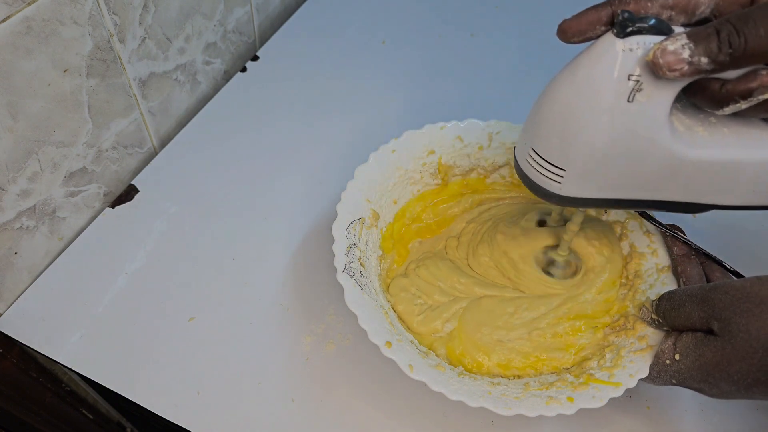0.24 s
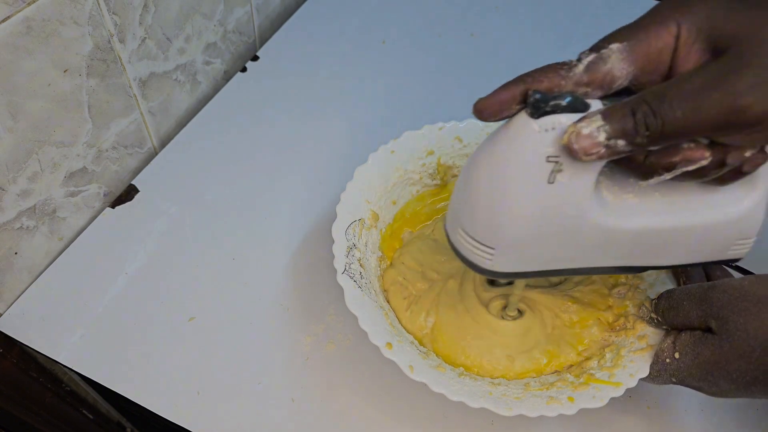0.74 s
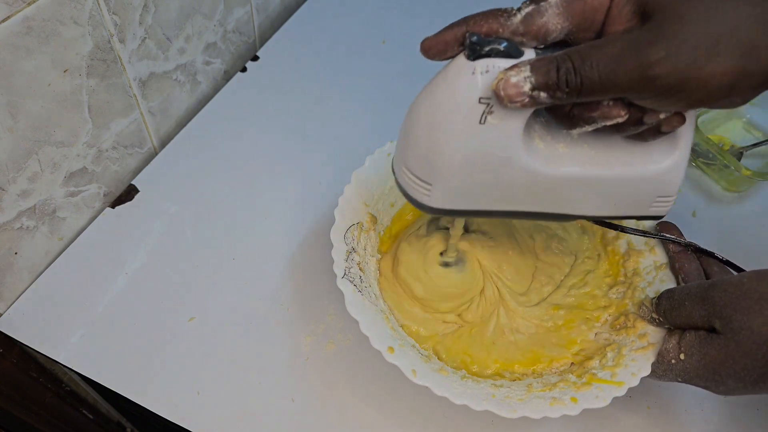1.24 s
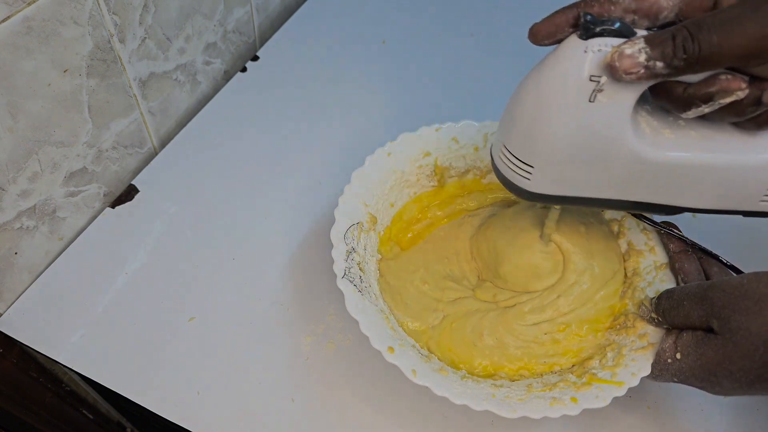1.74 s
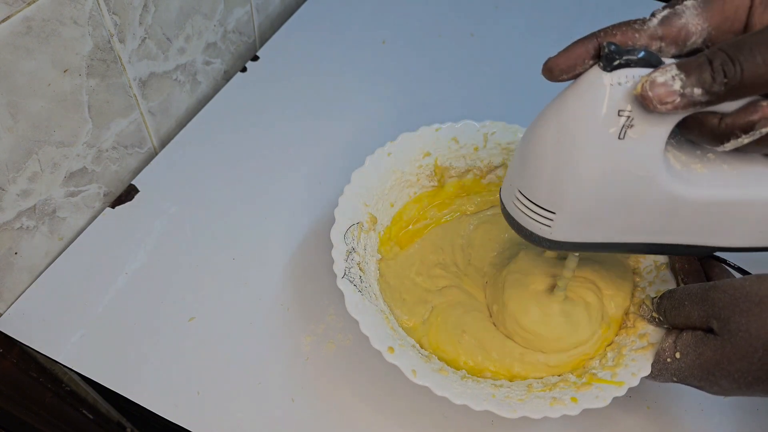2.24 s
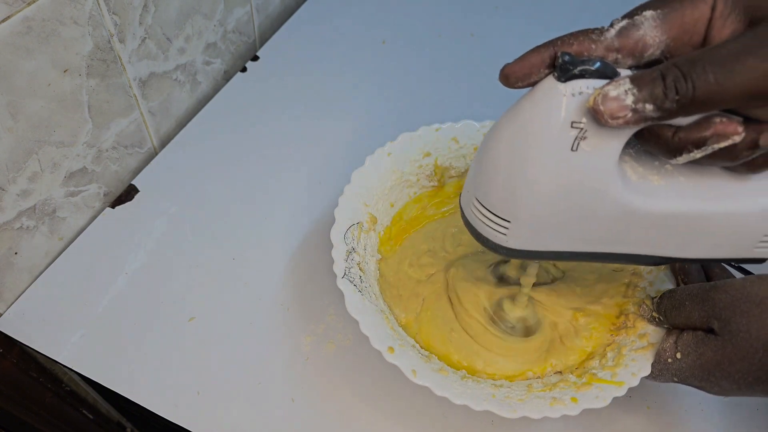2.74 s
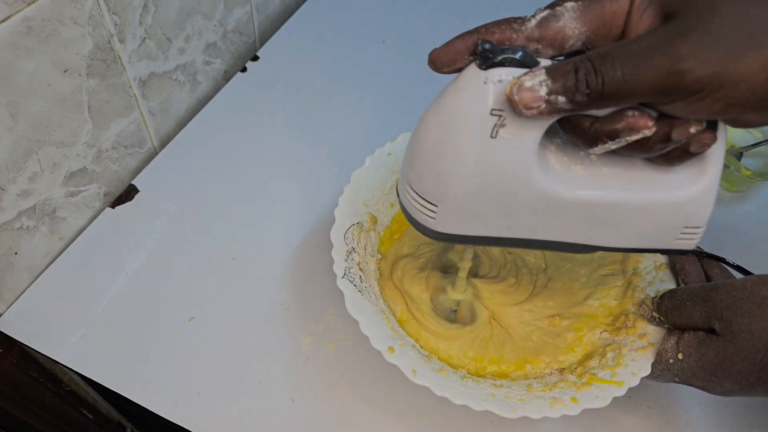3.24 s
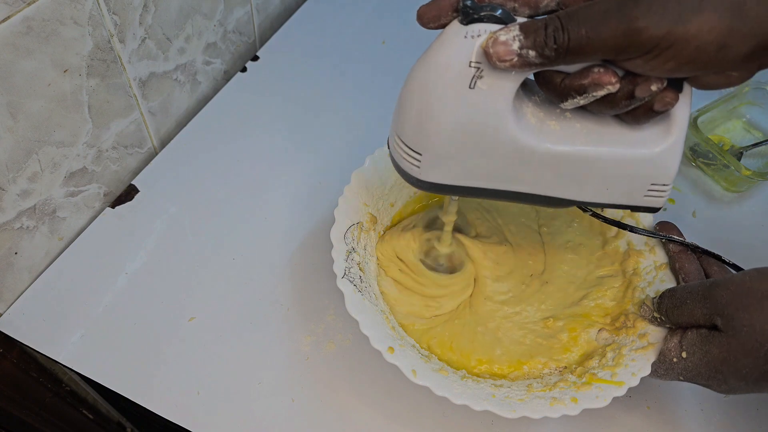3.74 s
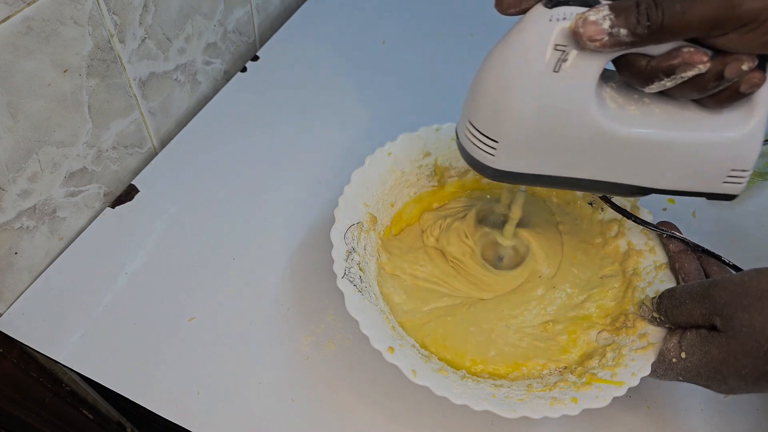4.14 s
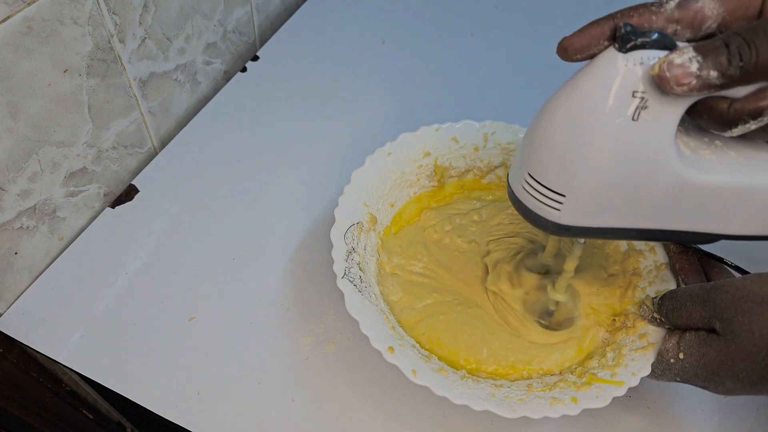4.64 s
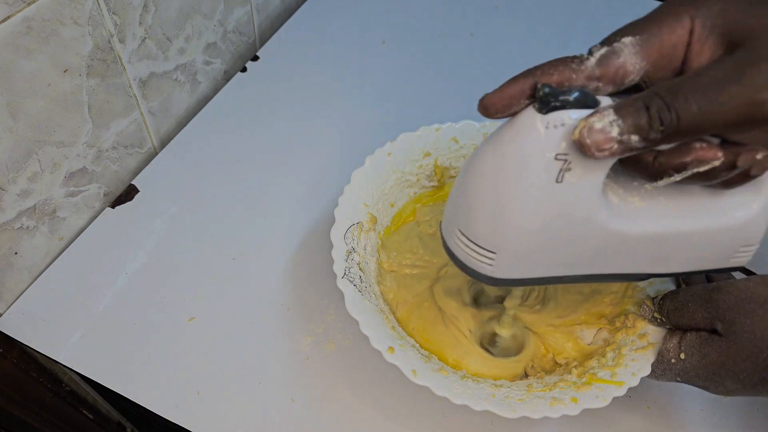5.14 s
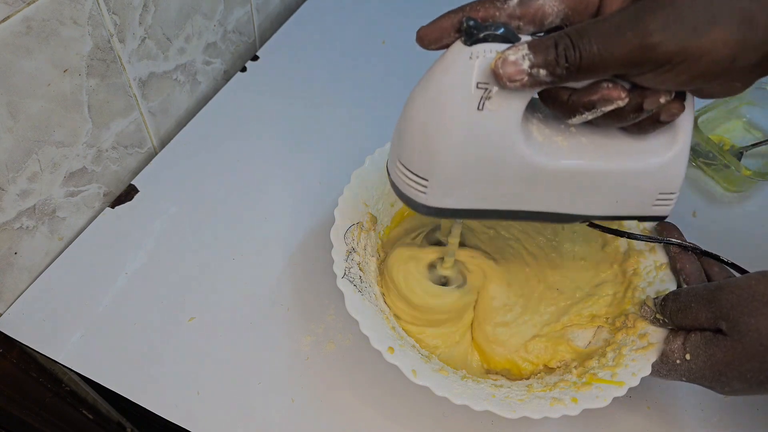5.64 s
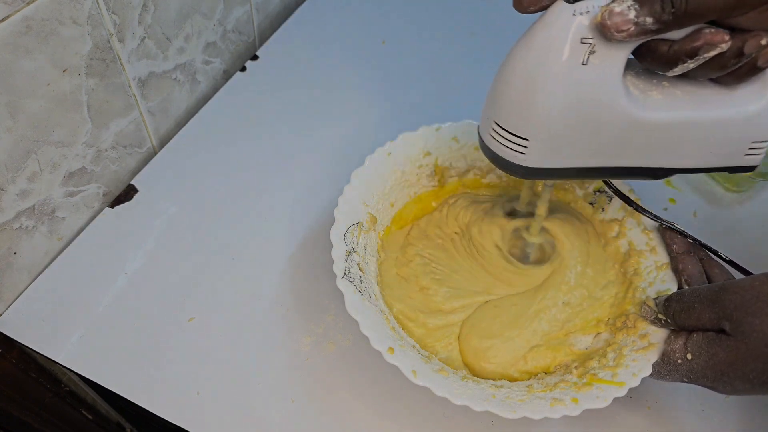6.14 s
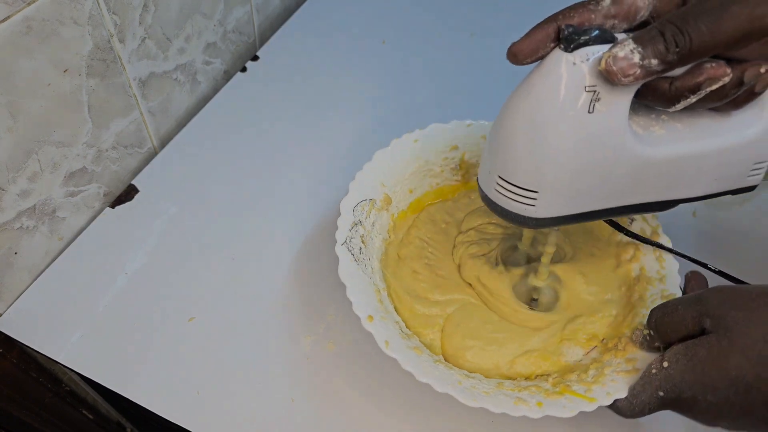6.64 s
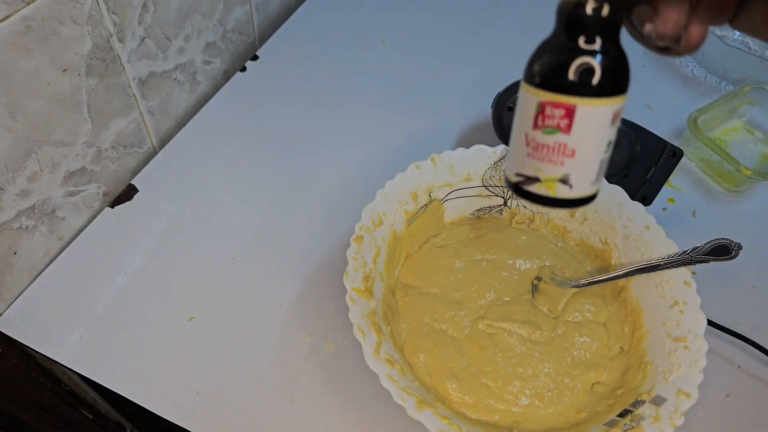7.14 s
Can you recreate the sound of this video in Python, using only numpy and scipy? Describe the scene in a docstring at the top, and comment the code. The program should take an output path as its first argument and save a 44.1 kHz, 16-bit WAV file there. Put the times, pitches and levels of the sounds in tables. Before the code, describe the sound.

Close buzzing whirr of a hand mixer, its pitch dipping and climbing under load, with brief bowl knocks and an abrupt stop.

```python
"""Hand mixer in thick batter

An electric hand mixer circles through a bowl of batter, close below a stereo microphone. Its motor sags under
load and sings sines on the shaft orders, which the casing modes lift. Shaped noise gives gear rattle, casing
boom, fan hiss and bowl drone; the beaters thud on the bowl and shake the counter beneath. Near 6.9 s all the
mixer's sound drops away within a millisecond, leaving the low rumble and faint tone of the quiet kitchen."""
import sys
import numpy as np
from scipy import signal
from scipy.fft import rfft, irfft
from scipy.io import wavfile
from scipy.ndimage import uniform_filter1d

SR = 44100
rng = np.random.default_rng(int(sys.argv[2]) if len(sys.argv) > 2 else 0)


def waveform_to_disk(signal):
    """Save audio, clipped to [-1, 1], as 16-bit WAV at the path in sys.argv[1]."""
    frames = np.transpose(np.atleast_2d(signal))
    scaled = np.clip(frames, -1, 1) * 32767
    samples = np.round(scaled).astype(np.int16)
    wavfile.write(sys.argv[1], SR, samples)


N = 326207  # samples

# Beaters rubbing the bowl. Each row: start in seconds, length in seconds, thud level in dB,
# bowl drone in dB, casing boom in dB, snag from 0 to 1.
SCRAPES = [(0.623, .14, -41, -53.5, -34, 0), (0.794, .15, -31, -45.5, -32, 0.43),
           (.97, 0.19, -50, -43.5, -33.5, 0.08), (2.953, .7, -60.5, -47, -36.5, .3),
           (4.947, .12, -49.5, -45.5, -41, 0.07), (5.102, 0.427, -53, -44, -37, 0.99)]
THUD_COLUMN, DRONE_COLUMN, BOOM_COLUMN = 2, 3, 4
GEAR, WIRES = 19.7, 4  # shaft turns for each beater turn; wires on a beater


def mixer():
    """Order synchronism: motor, gears, fan and beaters all take their pace from one shaft."""
    # The shaft under the changing load. Each row: time in seconds, speed in turns per second
    # before the rotor's inertia smooths it.
    speed = [(0.0, 274), (0.29, 273.0), (0.46, 277.2), (0.59, 282.3), (1.02, 287.3), (1.17, 283.6),
             (1.3, 277.6), (1.49, 255.1), (1.65, 243), (1.74, 239.5), (1.8, 241), (2.03, 262.6),
             (2.99, 320.6), (3.16, 325.6), (3.31, 328.5), (4.02, 311.1), (4.37, 314.9), (5.06, 315.6),
             (5.5, 302.6), (5.69, 301.1), (6.02, 305.3), (6.3, 301.9), (6.69, 311.5), (6.88, 308.9)]
    # The motor's state. Each row: time in seconds, level of the first order in dB (its swing about
    # the mean moves all the orders), left over right of the middle orders in dB, gear rattle in dB.
    motor = [(0, -54.5, 22, -32), (.14, -44, 7, -34), (.4, -41.5, 0.5, -35), (.73, -38.5, 2.5, -31),
             (1.09, -38.5, -6, -36), (1.24, -43.5, 5, -34), (1.62, -47, -7, -33), (1.76, -40.5, 1, -36.5),
             (1.92, -48.5, -6, -33.5), (2.05, -46, 2.5, -37), (2.57, -37, 3, -31), (2.78, -45, 0, -29.5),
             (2.97, -38.5, -2, -28.5), (3.2, -39, 8, -31), (3.7, -38, 1, -34), (4.1, -45.5, -0.5, -33.5),
             (4.5, -39, 4, -32), (5, -41.5, -4, -29.5), (5.5, -40, 4, -35), (5.8, -41, -2, -32.5),
             (6.25, -40, -3, -31), (6.6, -42.5, 0, -32), (6.88, -45, -1, -29.5)]
    inertia_s = 0.1  # the rotor rounds off speed changes
    shaft_hz = uniform_filter1d(columns(speed)[0], size=round(inertia_s * SR), mode="nearest")
    first_db, side_db, rattle_db = columns(motor)

    turns = np.cumsum(shaft_hz) / SR
    passes = WIRES * turns / GEAR  # beater wires passing one spot
    once_a_turn = np.cos(2 * np.pi * turns)
    each_pass = np.cos(2 * np.pi * passes)

    machine = whine(turns, shaft_hz, first_db, side_db) + casing_boom(each_pass)
    machine = machine + gear_rattle(rattle_db, once_a_turn) + fan_hiss(shaft_hz, once_a_turn)
    return machine + thuds(passes) + bowl_drone(each_pass) + counter_shake(passes, each_pass)


def whine(turns, shaft_hz, first_db, side_db):
    """Harmonic orders of rotation, lifted by resonances they pass and out of step at the two ports."""
    # The strong orders. Each row: order, level in dB before swings and resonances, share of the first
    # order's swings, out-of-step share, left over right in dB, share that rocks with the beaters
    # in a snag, level change in a full snag in dB.
    loud = [(1, -42, 1, .45, -2.5, 0.62, 4), (2, -63.5, .2, 0.12, 1.5, 0.066, 2.5),
            (3, -47, .6, .52, 2, .3, -1.5), (4, -53, .6, 0.66, -4, .3, -1),
            (5, -46.5, .6, 0.92, -.3, .3, -15), (7, -48, .3, .9, 0.5, .3, 4),
            (9, -44.5, .3, 0.63, 4.5, .1, 1), (12, -52.5, .2, 0.67, 0.5, .1, -2),
            (24, -57.5, .2, 1, 2, .1, 4.5), (36, -61.5, .2, .9, -17.5, .1, -1.5),
            (47, -68.5, .2, .9, -3.2, .1, -1)]
    # The fainter orders; fan blades and commutator bars lift those near multiples of twelve.
    # Each row: order, level in dB before swings and resonances.
    faint = [(6, -51), (8, -52.5), (10, -71), (11, -66), (13, -56.5), (14, -62.5), (16, -58), (18, -62.5),
             (20, -70.5), (21, -67), (22, -63.5), (23, -64), (25, -67), (26, -64), (27, -70.5), (28, -74.5),
             (29, -65.5), (30, -66), (31, -69.5), (32, -71), (33, -70), (34, -69.5), (35, -66.5),
             (37, -58.5), (38, -72), (46, -67), (48, -68)]
    # Casing modes that lift an order passing through. Each row: centre in Hz, width in Hz, lift in dB.
    shell = [(634, 35.6, 35.5), (752, 60, 3.5), (799, 50, 6.5), (955, 21, -5), (1089, 49, 12.5),
             (1211.5, 48, 11), (1314, 161, 13), (1517, 27, 7.5), (1557, 50, 7.5), (1730, 80, 0.5),
             (1873, 68, 7.5), (2261, 180, -1.5), (2622, 210, 2), (2884, 36, 3), (3660, 230, 6.5)]
    # Air slots that lift the high orders. Each row: centre in Hz, width in Hz, lift in dB.
    vents = [(7216, 250, 12), (7610, 720, 9), (11471, 400, -4.5), (14630, 500, 14.5)]
    # Single orders swell or fade for a moment.
    # Each row: start in seconds, length in seconds, order, level change in dB.
    sings = [(0, 0.74, 3, 2), (.2, 0.14, 5, 3), (0.547, 0.4, 5, -7), (.55, 1.2, 4, -1.5),
             (.55, 0.67, 9, 0.5), (1.22, .3, 3, 6), (1.2, .35, 9, 4), (1.38, .45, 7, 8.5), (1.2, .4, 25, 6),
             (1.62, 0.26, 5, 5.5), (1.62, 0.17, 9, 4), (1.618, 0.19, 12, 6.5), (1.65, .22, 3, 2),
             (1.95, 0.48, 5, 2.5), (2.33, 0.21, 9, 7), (2.55, 1.45, 5, -8), (2.624, .2, 4, 2),
             (2.95, 0.58, 4, 5), (3, .55, 22, 3.5), (3.6, 0.53, 24, 4), (3.95, .2, 12, 7.5),
             (4.15, .55, 36, 7), (4.15, 0.45, 24, -9), (4.242, .45, 9, 5.5), (4.55, 0.43, 3, 5),
             (4.8, 0.23, 12, 4), (4.856, 0.22, 24, 7.5), (5.349, 0.28, 24, 2.5), (5.9, 0.54, 5, -0.5),
             (5.95, 0.24, 2, 4.5), (6.506, .4, 4, -1.5)]

    out = np.zeros((2, N))
    rows = loud + [(order, db, 0.2, 0.9, 0, 0, -3) for order, db in faint]
    swell = wander(rate=4, count=len(rows))
    skew = wander(rate=0.53, count=len(rows))
    flutter = wander(rate=25, count=len(rows))
    slop = 0.0056 * wander(rate=40, count=1)[0]  # the shaft runs a little unevenly (turns)
    wobble = np.cos(2 * np.pi * turns / GEAR)  # the load swings once each beater turn
    snag = sum(row[-1] * held(row) for row in SCRAPES)
    grid = np.arange(0, SR / 2, 2.0)  # Hz
    lift = np.sqrt(1 + modes(shell + vents, grid) ** 2)

    for k, (order, db, follows, share, lean_db, rocks, snag_db) in enumerate(rows):
        order = round(order)
        # the middle orders lean left and right as the mixer moves
        lean_db = lean_db + side_db * (2 < order < 6)

        # level: load swings, snags, chance and brief swells or fades
        db = db + follows * (first_db - first_db.mean()) + snag_db * snag
        db = db + 1.6 * flutter[k] + 1.3 * swell[k] * (order > 2)
        db = db + sum(row[3] * held(row) for row in sings if round(row[2]) == order)
        if k >= len(loud):  # faint orders waver more
            db = db + 2.73 * flutter[k] + 1.3 * swell[k]
        size = np.sqrt(2) * gain_of(db) * np.interp(order * shaft_hz, grid, lift)

        # amplitude modulation by the beater load, deeper in a snag
        rocking = np.clip(rocks * snag, 0, 1)
        size = size * (1 - rocking + (0.11 / order + 0.9 * rocking) * wobble)

        # a quadrature part of opposite sign puts the ports out of step
        angle = 2 * np.pi * (order * (turns + slop) + rng.random())
        across = share * (1 + 0.3 * skew[k]) * np.cos(angle)
        out[0] += size * gain_of(lean_db / 2) * (np.sin(angle) + across)
        out[1] += size / gain_of(lean_db / 2) * (np.sin(angle) - across)
    return out


def gear_rattle(rattle_db, once_a_turn):
    """Resonant filtering: high casing modes colour noise that is amplitude-modulated once a shaft turn."""
    # High casing modes. Each row: centre in Hz, width in Hz, relative level in dB.
    rattle_modes = [(1295, 400, -6), (1841, 24, -4), (1911, 173, 4.5), (2082, 90, 3.5), (2535, 90, 0),
                    (2860, 67, -1.5), (3670, 180, -5.5), (7320, 220, -12.5)]
    rattle = gain_of(rattle_db) * noise(lambda hz: modes(rattle_modes, hz), patchy_db=0.97)
    chatter = gain_of(1.0 * wander(rate=70, count=1))  # loose gears chatter unevenly
    return rattle * (1 + 0.19 * once_a_turn) * chatter


def casing_boom(each_pass):
    """Forced resonance: low casing modes filter noise that swells slightly at each wire pass."""
    # Low casing modes. Each row: centre in Hz, width in Hz, relative level in dB.
    boom_modes = [(660, 150, 7.5), (674, 40, 7), (796, 440, -7)]
    boom = noise(lambda hz: modes(boom_modes, hz), patchy_db=0.72)
    free_db = -40  # beaters turning in batter alone
    return scrapes(free_db, BOOM_COLUMN) * boom * (1 + 0.069 * each_pass)


def fan_hiss(shaft_hz, once_a_turn):
    """Aerodynamic noise: broadband fan hiss whose level rises with shaft speed."""
    # Colour of the hiss. Each row: frequency in Hz, relative spectral level in dB.
    hiss_colour = [(88, -54.5), (150, -17.5), (259, -14.5), (308, -16.5), (482, -19.5), (621, -2),
                   (1050, -13), (1960, -7.5), (3190, -12.5), (3650, -13.5), (15700, -23.5)]
    base_db, db_per_hz, base_hz = -31, 0.0738, 309  # level at the base shaft speed, and its slope
    hiss_db = base_db + db_per_hz * (shaft_hz - base_hz)
    hiss = noise(lambda hz: gain_of(read(hiss_colour, hz)), patchy_db=1.3)
    return gain_of(hiss_db) * hiss * (1 + 0.037 * once_a_turn)


def thuds(passes):
    """Impact excitation: each wire pass gives a dull blow, and the hardest knocks ring bowl modes."""
    # Colour of the bowl on the counter. Each row: frequency in Hz, relative level in dB.
    thud_colour = [(30, -5.5), (55, 1.5), (120, -1.5), (250, 2), (500, -2.5), (800, -10), (1500, -4.5),
                   (4000, -60.5)]
    # The hardest knocks. Each row: time in seconds, level in dB applied to all the rings.
    hard_knocks = [(0.609, -20), (0.654, -19), (0.8, -8.5), (0.811, -14), (0.836, -10.5), (0.849, -14),
                   (0.87, -9), (0.905, -9), (0.924, -15), (1.002, -24), (1.084, -18.5), (1.109, -28),
                   (1.141, -16), (1.154, -32), (4.989, -18), (5.049, -30), (5.099, -19)]
    # Bowl rings. Each row: frequency in Hz, starting level in dB within a knock, 60 dB decay in seconds.
    bowl_rings = [(60, -23, 0.055), (115, -18.5, 0.038), (273.4, -16, 0.018), (440, -18.5, 0.045),
                  (535, -9, 0.035), (698, -12, 0.04)]

    at = np.flatnonzero(np.diff(np.floor(passes)) > 0)
    draw = rng.standard_normal((len(at), 2))
    jitter = (60 * draw[:, 0]).astype(int)  # samples
    clicks = np.zeros(N)
    clicks[np.clip(at + jitter, 0, N - 1)] = gain_of(2.5 * draw[:, 1])

    # minimum phase turns the colour into a causal blow
    log_gain = np.log(gain_of(read(thud_colour, abs(np.fft.fftfreq(8192, 1 / SR)))))
    blow = np.fft.ifft(np.exp(np.conj(signal.hilbert(log_gain)))).real[:4096]
    drag = signal.oaconvolve(clicks, np.exp(-np.arange(900) / 570.0))[:N]  # the wire drags a moment
    rough = drag * (0.18 + rng.standard_normal(N))
    free_db = -52  # beaters turning in batter alone
    mono = scrapes(free_db, THUD_COLUMN) * evened(signal.oaconvolve(rough, blow)[:N])

    t = np.arange(4000) / SR
    onset = np.minimum(t / 0.0017, 1)
    for s, db in hard_knocks:  # each knock lands on another spot, so its modes shift a little
        ring = np.zeros(len(t))
        for hz, ring_db, t60 in bowl_rings:
            shift, phase = rng.uniform(0.95, 1.07), rng.random()
            ring += gain_of(ring_db - 60 * t / t60) * np.sin(2 * np.pi * (hz * shift * t + phase))
        mono[round(s * SR):][:len(t)] += gain_of(db) * ring * onset
    # the bowl sits nearer the left port: louder there, two samples later at the right
    return np.array([1.04 * mono, 0.96 * np.roll(mono, 2)])


def bowl_drone(each_pass):
    """Friction excitation: rubbing noise drives the bowl modes, modulated at each wire pass."""
    # Bowl modes. Each row: centre in Hz, width in Hz, relative level in dB.
    bowl_modes = [(220, 41, 4), (352, 74, 5.5)]
    drone = noise(lambda hz: modes(bowl_modes, hz), patchy_db=0.95)
    free_db = -58.5  # beaters turning in batter alone
    return scrapes(free_db, DRONE_COLUMN) * drone * (1 + 0.17 * each_pass)


def counter_shake(passes, each_pass):
    """Forced vibration: the counter shakes at the wire-pass rate and its octave, with narrow-band noise."""
    # The counter shaking under the bowl. Each row: time in seconds, level of the low shake in dB,
    # level of its octave in dB.
    shake_levels = [(0, -49, -66), (.3, -54, -58), (.75, -43, -58), (.9, -46.5, -35), (1.05, -52, -66),
                    (1.3, -45, -63.5), (1.65, -55, -64), (2.5, -53, -57.5), (3.0, -54, -72),
                    (3.7, -46, -62), (4.1, -55.5, -67.5), (4.4, -87.5, -62), (5.3, -52.5, -59),
                    (5.6, -54.5, -49.5), (6.7, -64.5, -55.5), (6.89, -56, -64)]
    shake_db, octave_db = columns(shake_levels)
    shake = 0.55 * noise(lambda hz: modes([(67.6, 22, 0)], hz), patchy_db=1.6) + each_pass
    octave = np.sin(4 * np.pi * passes)  # two beaters mesh
    return gain_of(shake_db) * shake + gain_of(octave_db) * octave


def scrapes(free_db, column):
    """Power addition: the gain of free turning joined by that of each rub on the bowl."""
    rubbing = sum((gain_of(row[column]) * held(row)) ** 2 for row in SCRAPES)
    return np.sqrt(gain_of(2 * free_db) + rubbing)


def kitchen():
    """Background noise: building rumble, alike in the bass and less so higher up, and an appliance tone."""
    # Colour of the rumble. Each row: frequency in Hz, relative spectral level in dB.
    rumble_colour = [(15, -54), (25, -27.5), (37, -18), (41, -19), (49, -12.5), (70, -9.5), (82, -7),
                     (93, -16.5), (178, -33), (367, -44.5), (500, -40), (600, -45.5), (4500, -62),
                     (7000, -73), (12000, -74), (15600, -104), (22000, -120)]
    rumble_db, hum_hz, hum_db = -57, 500.6, -81  # rms levels
    hz = np.fft.rfftfreq(N, 1 / SR)
    a, b = rfft(rng.standard_normal((N, 2)).T)
    apart = np.clip(hz / 900, 0.1, 1)
    ports = np.array([1.4 * (a + apart * b), a - apart * b])
    rumble = evened(irfft(ports * gain_of(read(rumble_colour, hz)), N))
    hum = np.sqrt(2) * np.sin(2 * np.pi * hum_hz * np.arange(N) / SR)
    return gain_of(rumble_db) * rumble + gain_of(hum_db) * hum


def noise(colour, patchy_db):
    """Partial coherence: two partly alike channels of coloured noise, louder and softer in patches."""
    # Likeness of the channels. Each row: frequency in Hz, left-right correlation from 0 to 1.
    likeness = [(60, 0.99), (140, 0.98), (300, 0.94), (650, 0.84), (1000, 0.27), (2000, 0.05),
                (8000, 0.026)]
    # Balance of the channels. Each row: frequency in Hz, left over right in dB.
    balance = [(60, -4), (140, 10), (300, -9.5), (650, 4), (1200, 0.3), (8000, 0.3)]
    frames, hz = N // 256 + 5, np.fft.rfftfreq(1024, 1 / SR)
    a, b, c, d, patches = rng.standard_normal((frames, 513, 5)).T
    patches = uniform_filter1d(patches, size=10, axis=0)  # over frequency
    patches = evened(uniform_filter1d(patches, size=16, axis=1))  # over time
    same = np.clip(read(likeness, hz), -1, 1)[:, None]
    lean = gain_of(read(balance, hz) / 2)[:, None]
    left = a + 1j * b
    right = same * left + np.sqrt(1 - same ** 2) * (c + 1j * d)
    z = np.array([left * lean, right / lean])
    z *= colour(hz)[:, None] * gain_of(patchy_db * patches)
    return evened(signal.istft(z, nperseg=1024, noverlap=768)[1][:, :N])


def modes(table, hz):
    """Modal superposition: steep resonances side by side, their powers added, as gain."""
    power = sum(gain_of(2 * db) / (1 + (2 * (hz - f) / width) ** 2) ** 2 for f, width, db in table)
    return np.sqrt(power)


def wander(rate, count):
    """Low-passed chance: smoothed random steps of rms 1, one row each, at about rate in Hz."""
    steps = rng.standard_normal((count, int(N / SR * rate * 4) + 8))
    smooth = evened(uniform_filter1d(uniform_filter1d(steps, size=4), size=4))
    position = np.arange(N) / SR * rate * 4
    return np.array([np.interp(position, np.arange(len(row)), row) for row in smooth])


def held(row):
    """Linear envelope: 0 to 1 and back over one event whose row opens with its start and length."""
    grip_s, let_go_s = 0.012, 0.05
    start, length = row[:2]
    t = np.arange(N) / SR
    rise = np.clip((t - start) / grip_s, 0, 1)
    return rise * np.clip(1 + (start + length - t) / let_go_s, 0, 1)


def columns(table):
    """Linear interpolation in time: every column of a curve table, sample by sample."""
    s, *rest = np.transpose(table)
    return [np.interp(np.arange(N) / SR, s, c) for c in rest]


def read(points, hz):
    """Logarithmic pitch scale: a spectrum table interpolated at the frequencies hz."""
    f, value = np.transpose(points)
    return np.interp(np.log(hz + 1), np.log(f + 1), value)


def gain_of(db):
    """Decibel law: level to amplitude gain."""
    return 10 ** (np.asarray(db) / 20)


def evened(x):
    """Energy normalization: scaled to rms 1."""
    return x / np.sqrt(np.mean(x ** 2) + 1e-20)


def scene():
    """Superposition: the mixer is heard until its sound drops away within a millisecond, the kitchen
    throughout."""
    end_s, fade_s = 6.8895, 0.001
    running = np.clip((end_s - np.arange(N) / SR) / fade_s, 0, 1)
    return mixer() * running + kitchen()


def record(dry):
    """Band limitation: the microphone drops the deepest bass, then a steep low-pass trims the top."""
    edge_hz = 15800
    bass_cut = signal.butter(2, 24, "high", fs=SR, output="sos")
    thinned = signal.sosfilt(bass_cut, dry)
    low_pass = signal.firwin(1501, edge_hz, window=("kaiser", 9), fs=SR)
    return signal.oaconvolve(thinned, low_pass[None], "same")


dry = scene()
out = record(dry)
waveform_to_disk(out)
```